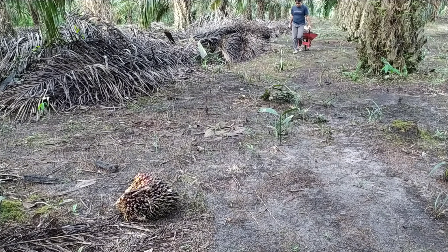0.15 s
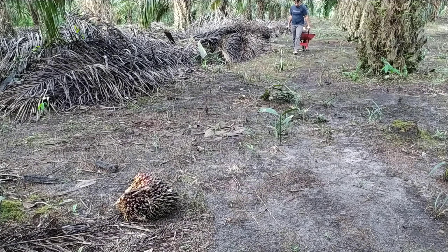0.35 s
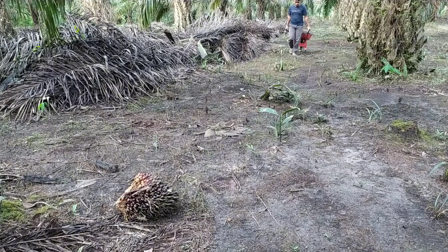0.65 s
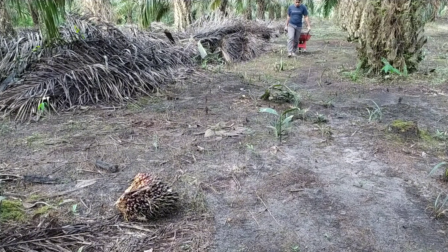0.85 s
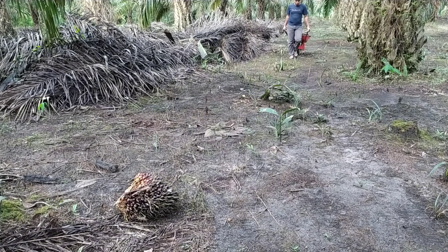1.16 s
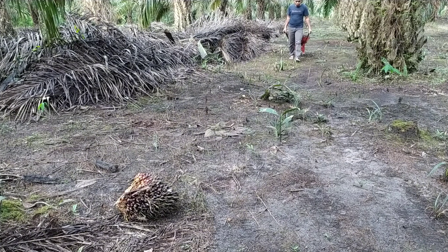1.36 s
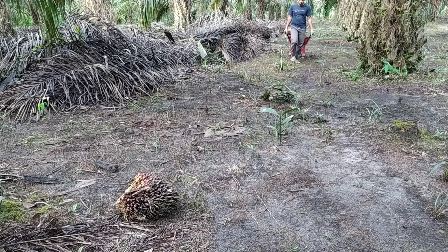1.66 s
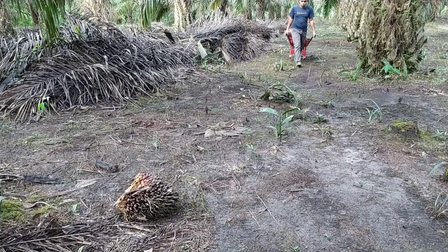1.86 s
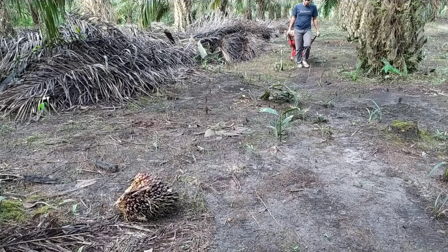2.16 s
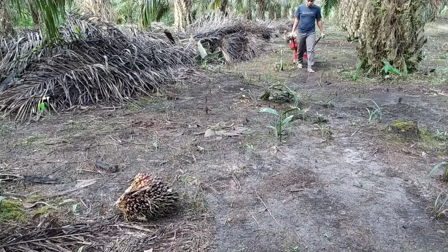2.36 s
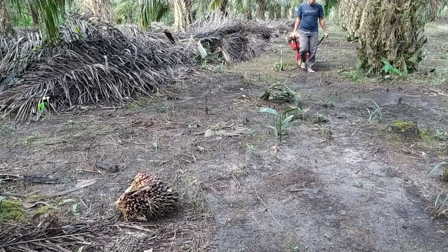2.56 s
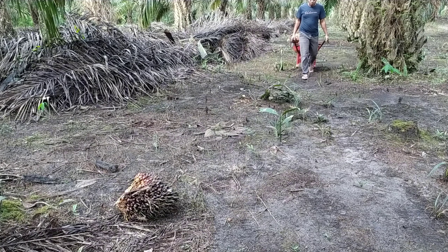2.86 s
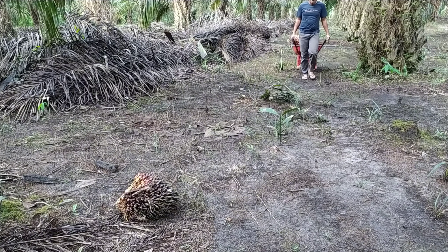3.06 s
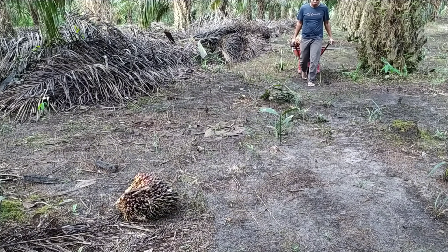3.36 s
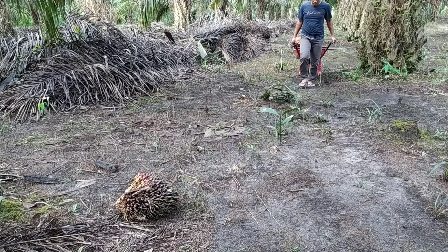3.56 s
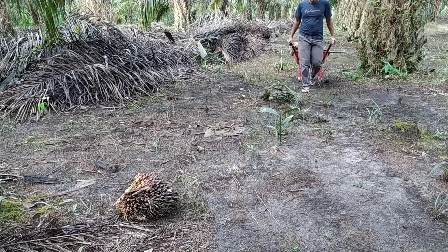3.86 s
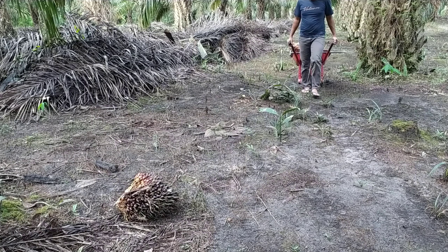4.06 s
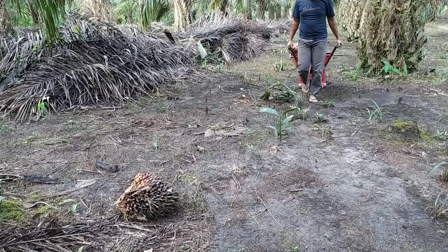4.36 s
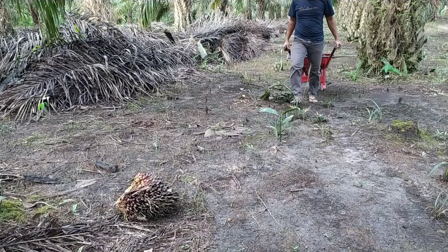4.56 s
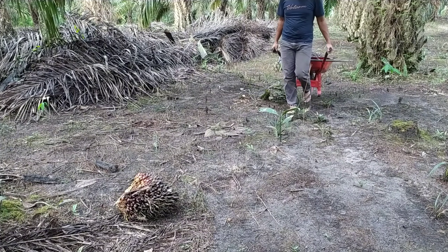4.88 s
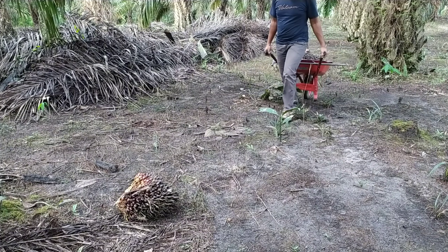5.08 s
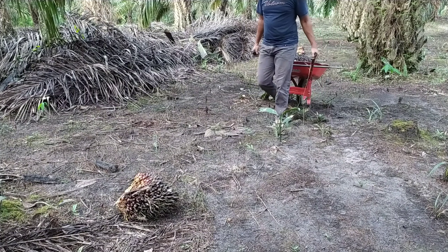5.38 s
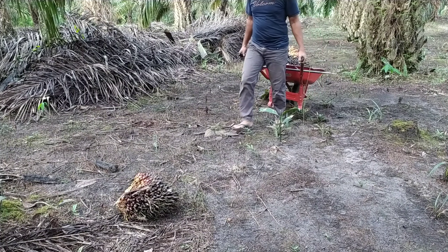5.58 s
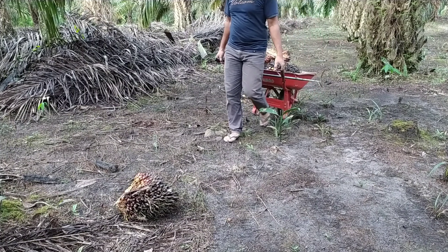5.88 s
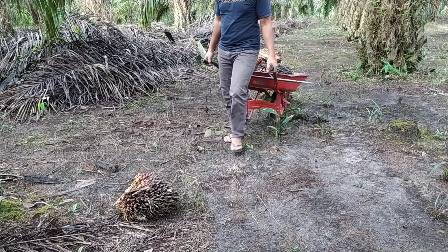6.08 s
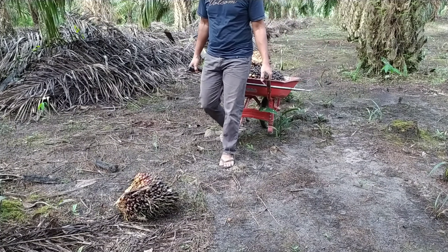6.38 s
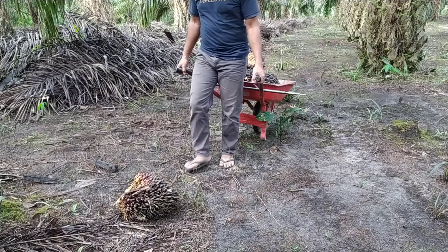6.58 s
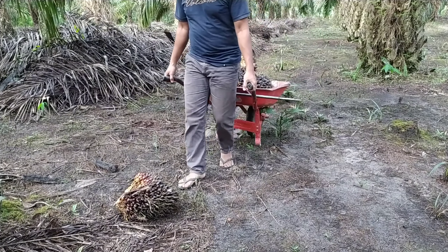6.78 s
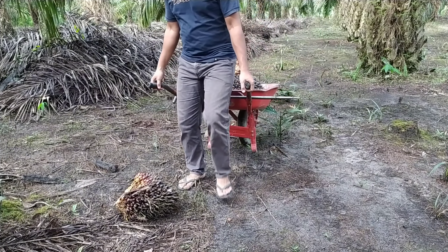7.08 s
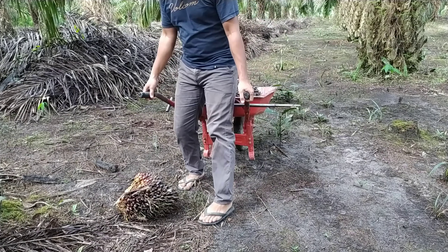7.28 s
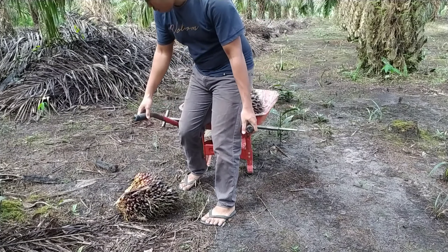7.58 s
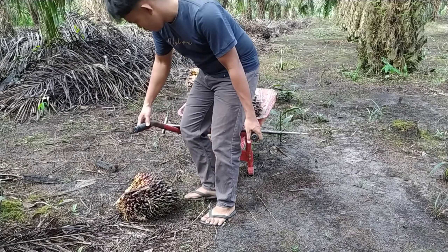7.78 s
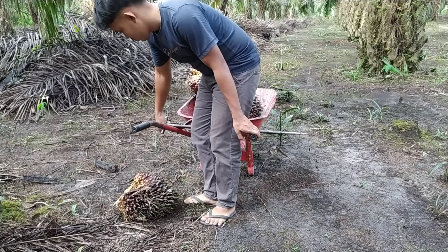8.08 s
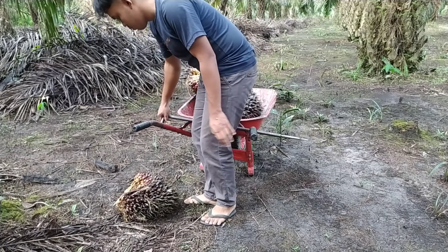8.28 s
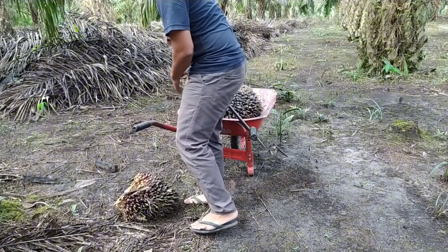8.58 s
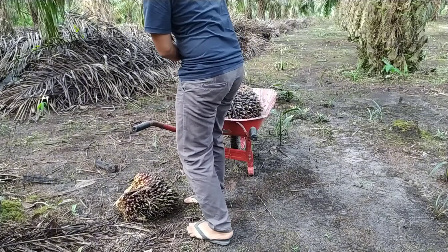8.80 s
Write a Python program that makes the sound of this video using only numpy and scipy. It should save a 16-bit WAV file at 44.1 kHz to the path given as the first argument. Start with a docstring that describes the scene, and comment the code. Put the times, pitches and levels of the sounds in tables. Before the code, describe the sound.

Insects drone steadily as a loaded wheelbarrow rolls closer over crunchy ground, is set down with a rattling knock, and metal clanks.

```python
"""Wheelbarrow in a palm grove

Stereo microphone among the palms: cicadas click their tymbals into a drone, two crickets chirp with
their wings, an engine idles far off. A loaded wheelbarrow comes from 18 m to about 4 m, its tyre
grinding grit, the load bumping, the frame ticking, sandals crunching on dry litter. It is set down
with a rattling knock, then a steel spike lying across it clanks on the tray."""
import sys
import numpy as np
from scipy import signal
from scipy.fft import rfft, irfft, next_fast_len
from scipy.io import wavfile
from scipy.ndimage import uniform_filter1d

SR = 44100
rng = np.random.default_rng(int(sys.argv[2]) if len(sys.argv) > 2 else 0)


def generate_wav(sig):
    """Save sig (samples, or channels by samples) to the path in sys.argv[1] as 16-bit PCM at SR."""
    pcm = np.round(np.clip(np.atleast_2d(sig).T, -1, 1) * 32767).astype(np.int16)
    wavfile.write(sys.argv[1], SR, pcm)


N = 394254

TIME = np.arange(N) / SR
FAR_M, NEAR_M = 18, 4.2  # barrow to microphone, at the start and at the stop
STOP_S, SLOWING_S = 7.2, .2

# likeness of the two channels, high in the bass: f/Hz, correlation
COHERENCE = [(25, .8), (60, .85), (150, .95), (600, .95), (1400, .72), (3000, .35), (6000, 0), (16000, 0)]
# the barrow in the stereo image: f/Hz, left minus right/dB
BARROW_BALANCE = [(200, 1), (1300, 0), (4400, 2.5), (9000, 0), (15000, 19)]
# spectrum of grit under wheel and feet: f/Hz, level/dB
GRIT_SPECTRUM = [(250, -9), (450, -4), (900, -2), (1800, -5), (2700, 0), (3400, -6), (4200, -6), (9000, -5),
                 (15000, -23)]
# spectrum of dry leaves and twigs breaking: f/Hz, level/dB
CRISP_SPECTRUM = [(2000, -44), (4500, -23), (7500, 5), (10500, 8.5), (12500, -2.5), (15500, -9)]


def gain_of(db):
    """Decibels to amplitude."""
    return 10 ** (np.asarray(db) / 20)


def evened(x):
    """Scales to an rms of one."""
    return x / np.sqrt(np.mean(x ** 2) + 1e-20)


def read(points, hz):
    """Reads a table on a logarithmic frequency axis."""
    f, value = np.transpose(points)
    return np.interp(np.log(hz + 1), np.log(f + 1), value)


def level(rows, axis=1):
    """One dB column of a curve as a gain for every sample."""
    rows = np.asarray(rows)
    return gain_of(np.interp(TIME, rows[:, 0], rows[:, axis]))


def add(mix, s, sound):
    """Mixes a sound in at time s."""
    part = mix[:, max(round(s * SR), 0):][:, :sound.shape[-1]]
    part += sound[..., :part.shape[1]]


def noise(spectrum, size=N, grain_db=0, side=None):
    """Stereo noise of a given colour, alike in the bass; grain_db breaks it into separate grains."""
    hz = np.fft.rfftfreq(size, 1 / SR)
    grains = gain_of(grain_db * np.minimum(rng.exponential(1, size), 7))
    mid, wide = rfft(rng.standard_normal((2, size)) * grains)
    same = np.clip(read(COHERENCE, hz), -1, 1)
    z = mid * np.sqrt(1 + same) + np.outer([1, -1], wide * np.sqrt(1 - same))
    if side is not None:
        z = z * gain_of(np.outer([.5, -.5], read(side, hz)))
    return evened(irfft(z * gain_of(read(spectrum, hz)), size))


def wander(rate_hz, size=N):
    """Smooth random drift of rms one, rolled off above the rate."""
    hz = np.fft.rfftfreq(size, 1 / SR)
    return evened(irfft(rfft(rng.standard_normal(size)) * np.exp(-(hz / rate_hz) ** 2), size))


def dying(t, t60):
    """Falls by 60 dB in t60."""
    return np.exp(-np.log(1000) * t / np.maximum(t60, 1e-3))


def burst(spectrum, t60, rise, grain_db=0, side=None):
    """A quick swell of noise that dies away; t60 and rise are in seconds."""
    t = np.arange(SR // 2) / SR
    return noise(spectrum, len(t), grain_db, side) * dying(t, t60) * (1 - np.exp(-t / max(rise, 1e-5)))


def ring(modes, t, split=.0043, uneven_db=2):
    """Struck modes, each a close pair that beats; every blow weights them anew."""
    hz, db, t60 = np.transpose(modes * 2)[:, :, None]
    below_above = np.repeat([-1, 1], len(modes))[:, None]
    hz = hz * (1 + split * below_above * rng.uniform(.52, 1, hz.shape))
    force = gain_of(db + uneven_db * rng.standard_normal(hz.shape))
    # high modes reach the two channels out of step
    skew = np.arccos(read(COHERENCE, hz)) * rng.choice([-.5, .5], hz.shape)
    phase = 2 * np.pi * (hz * t + rng.random(hz.shape))
    envelopes = force / np.linalg.norm(force) * np.sqrt(2) * dying(t, t60)
    return np.array([(envelopes * np.sin(phase + sign * skew)).sum(0) for sign in (1, -1)])


def grove(x, wet_db, t60, pan_db=0):
    """A distant caller at the microphone: direct sound plus scatter from trunks and fronds."""
    t = np.arange(SR // 2) / SR
    taps = rng.standard_normal((2, len(t))) * dying(t, t60)
    taps *= gain_of(wet_db) / np.linalg.norm(taps[0])
    taps[:, 0] += 1
    balance = gain_of([[pan_db / 2], [-pan_db / 2]])
    return balance * signal.fftconvolve(x, taps / np.linalg.norm(taps[0]), axes=1)[:, :N]


def hum(hz, db):
    """One low tone that wavers a little in level."""
    amplitude = np.sqrt(2) * gain_of(db + 1.3 * wander(3))
    return amplitude * np.sin(2 * np.pi * (np.cumsum(hz * np.ones(N)) / SR + rng.random()))


def far_engine():
    """An idling engine so far off that only low orders of its firing rate carry."""
    # the idle: t/s, firing rate/Hz, level of the third order/dB
    idle_course = [(0, 17.25, -61.5), (3.2, 17.3, -58), (3.5, 17.7, -57.5), (8.35, 17.7, -62),
                   (8.52, 17.7, -53), (8.94, 17.7, -53)]
    # weaker orders: multiple of the firing rate, level/dB
    weak_orders = [(2, -68.5), (4, -67)]
    s, firing_hz, main_db = np.transpose(idle_course)
    rate_hz = np.interp(TIME, s, firing_hz) * (1 + .0035 * wander(2.84))
    main = hum(3 * rate_hz, np.interp(TIME, s, main_db))
    return main + sum(hum(k * rate_hz, db) for k, db in weak_orders)


def grove_air():
    """The bed of the grove: still air, a far hum, rumble and a hollow rush that swells and sinks."""
    # spectra of the air, the rumble and the rush: f/Hz, level/dB
    air_spectrum = [(20, 17), (100, 5), (300, 0.5), (600, -8.5), (1200, -11.5), (2200, -9.5), (2550, -15),
                    (3050, -1.5), (3300, -22), (3900, -27), (8000, 0.5), (11800, -23.5), (12750, -2),
                    (13200, 0), (14200, -5.5), (15400, -14), (16200, -35)]
    rumble_spectrum = [(15, -21), (35, -2), (65, 6.5), (85, -2), (130, -23), (300, -54)]
    rush_spectrum = [(80, -23), (130, -6.5), (175, 2), (250, -1), (340, -11), (600, -18), (1200, -40)]
    # swells of the rush: t/s, level/dB
    rush_swells = [(0.1, -70), (0.24, -60), (0.82, -69), (1.0, -57.5), (1.36, -64), (1.78, -57),
                   (1.96, -61), (2.61, -58), (3.97, -66), (4.31, -53.5), (4.41, -60), (5.19, -62.5),
                   (5.35, -55), (6.08, -66.5), (7.16, -55), (7.3, -62.5), (8.2, -67), (8.672, -54.5),
                   (8.94, -60)]
    rumble = hum(hz=67.8, db=-67) + gain_of(-64.5) * noise(rumble_spectrum)
    rush = level(rush_swells) * noise(rush_spectrum) * gain_of(1.46 * wander(13))
    return gain_of(-58.5) * noise(air_spectrum) + rumble + rush


def whines():
    """Faint, very high insect tones out in the grove, most gliding slowly in pitch."""
    # whines: start t/s, length/s, first f/Hz, last f/Hz, level/dB
    whine_glides = [(0, .9, 12150, 12300, -72), (0, .9, 11700, 11790, -75), (3, 2.3, 12360, 12110, -72),
                    (3.1, 1.1, 11590, 11890, -73), (4.2, 1.2, 12030, 12330, -73),
                    (5.1, 1.8, 12120, 11990, -70.5), (6.9, 1.5, 11980, 11890, -72),
                    (8.35, .59, 11560, 11700, -71), (0, 8.94, 7576, 7576, -66)]
    out = np.zeros((1, N))
    for s, length, from_hz, to_hz, db in whine_glides:
        size = int(length * SR)
        jitter = 1 + .003 * wander(200, next_fast_len(size))[:size]
        hz = np.linspace(from_hz, to_hz, size) * jitter
        tone = np.sin(2 * np.pi * np.cumsum(hz) / SR) * signal.windows.tukey(size, .2)
        add(out, s, gain_of(db) * evened(tone))
    return grove(out, wet_db=0, t60=.3)


def far_trill(pitch_hz=6110, pulse_hz=32.4):
    """A thin, distant insect trill: one tone, quickly pulsed."""
    # its comings and goings: t/s, relative level/dB
    trill_swells = [(0, -77), (1, -58), (1.3, -51), (3.1, -53), (3.4, -78), (3.8, -49.5), (5.8, -49),
                    (6.2, -56), (8.94, -60)]
    hz = pitch_hz * (1 + .002 * wander(.6) + .01 * wander(260))
    pulsing = 1 + .5 * np.sin(2 * np.pi * pulse_hz * TIME)
    trill = evened(np.sin(2 * np.pi * np.cumsum(hz) / SR) * pulsing)
    return gain_of(-6.5) * level(trill_swells) * grove(trill[None], wet_db=-2, t60=.3)


def shimmer(chorus, depth_db):
    """Single callers drift in and out of a chorus, each a narrow band of its own."""
    bands = signal.stft(chorus, SR, nperseg=1024)[2]
    patches = uniform_filter1d(rng.standard_normal(bands.shape[1:]), size=2, axis=0)
    patches = evened(uniform_filter1d(patches, size=50, axis=1))
    return evened(signal.istft(bands * gain_of(depth_db * patches), SR, nperseg=1024)[1][:, :N])


def cicadas(heave_period_s=.81, crest_s=.07):
    """Countless tymbal clicks all round merge into two shimmering bands; the upper one heaves slowly."""
    # spectra of the two choruses: f/Hz, level/dB
    low_spectrum = [(3700, -26.5), (4250, -24), (4550, -4.5), (4800, -9.5), (5400, 0), (5900, -8.5),
                    (6400, -1), (7150, 3.5), (7600, -1.5), (8050, -6.5), (8350, 1), (8650, -23),
                    (9500, -53)]
    high_spectrum = [(8200, -65), (8650, -18), (9000, -4.5), (9300, -4.5), (9700, 1.5), (10400, 0.5),
                     (10900, -5), (11200, -12.5), (11500, -49), (12500, -50)]
    # their spread in the stereo image: f/Hz, left minus right/dB
    chorus_balance = [(4500, 5), (7000, -3.5), (8300, 0.5), (9000, -7), (9700, -2), (10400, 11.5),
                      (11100, 11.5), (12000, -3)]
    # course of the drone: t/s, relative level of the low chorus/dB, of the high chorus/dB
    drone_course = [(0, -49, -52), (1, -50, -51), (1.7, -48.5, -52), (4.3, -49, -50), (6.9, -48.5, -51.5),
                    (7.3, -48.5, -53), (8.94, -50, -52)]
    low = shimmer(noise(low_spectrum, grain_db=1.8, side=chorus_balance), depth_db=3.3)
    high = shimmer(noise(high_spectrum, grain_db=1.1, side=chorus_balance), depth_db=2)
    heave_db = .8 * np.cos(2 * np.pi * (TIME - crest_s) / heave_period_s)
    low *= level(drone_course, axis=1) * gain_of(1 + .5 * wander(27))
    high *= level(drone_course, axis=2) * gain_of(3.5 + heave_db + .4 * wander(44))
    return low + high


def chirp(length_s, hz, strokes_hz, sag, rough, sharp):
    """Each wing stroke sounds one short pulse whose pitch sags as the wing slows."""
    t = np.arange(int(length_s * SR)) / SR
    strokes = t * strokes_hz
    progress = strokes % 1
    force = gain_of(.16 * rng.standard_normal(32))[strokes.astype(int)]
    pitch_hz = hz * (1 - sag * (progress - .5) + rough * wander(490, size=16384)[:len(t)])
    pulses = force * np.abs(np.sin(np.pi * progress)) ** sharp
    tone = np.sin(2 * np.pi * np.cumsum(pitch_hz) / SR)
    return evened(pulses * tone * signal.windows.tukey(len(t), .1))


def crickets(beat_s=.17675, syllable_s=.0341, spacing_s=.0435, grow_db=2.2):
    """Two crickets a little to the right: one keeps a beat, a lower one answers in two bouts."""
    # answering calls: middle of the last syllable t/s, syllables, level of the last/dB
    answer_calls = [(2.083, 3, -55), (2.258, 2, -50), (2.55, 3, -45.5), (2.75, 2, -47), (5.0, 2, -52),
                    (5.26, 3, -44.5), (5.5, 3, -44.5), (5.71, 3, -44.5), (5.95, 3, -44.5),
                    (6.157, 2, -45.5), (6.4, 3, -44.5), (6.6, 2, -46.5), (6.803, 2, -47)]
    regular, answering = np.zeros((2, 1, N))
    for k in range(38):
        lag_s = .043 * (1 - np.exp(-k / 4))  # starts a little slowly, then settles
        pulses = chirp(.075, hz=5360, strokes_hz=80, sag=.25, rough=.02, sharp=5.5)
        add(regular, .0285 + k * beat_s + lag_s, gain_of(-51.2 + .5 * rng.standard_normal()) * pulses)
    for last_s, count, db in answer_calls:
        for k in range(count):  # counted back from the last, loudest syllable
            pulses = chirp(syllable_s, hz=4900, strokes_hz=88, sag=.19, rough=.025, sharp=2.5)
            pulses *= signal.windows.tukey(len(pulses), .6)
            add(answering, last_s - k * spacing_s - syllable_s / 2, gain_of(db - k * grow_db) * pulses)
    regular = grove(regular, wet_db=-4, t60=.24, pan_db=-2.5)
    return regular + grove(answering, wet_db=1, t60=.36, pan_db=-1)


def nearness(s):
    """Inverse-distance gain of the barrow, closing at a steady pace: one where it stops."""
    return NEAR_M / np.interp(s, [0, STOP_S], [FAR_M, NEAR_M])


def crunch(length_s, body_db, crisp_db):
    """One press on dry leaves: clumps of dull and crisp grains."""
    size = 16384
    body = gain_of(body_db) * noise(GRIT_SPECTRUM, size, grain_db=3)
    crisp = gain_of(crisp_db) * noise(CRISP_SPECTRUM, size, grain_db=2)
    clumps = (body + crisp) * gain_of(2.2 * wander(110, size) - 1)
    press = signal.windows.tukey(int(length_s * SR), .6)
    return clumps[:, :len(press)] * press


def litter(first_step_s=.85, step_s=.409):
    """Dry leaves crunch under feet and wheel, twigs snap, and sandals scuff nearer at an even pace."""
    # louder crunches: t/s, length/s, body level/dB, crisp level/dB
    leaf_crunches = [(4.081, 0.18, -63, -45), (4.297, 0.15, -56, -48), (4.753, 0.1, -49.5, -41.5),
                     (4.901, 0.064, -60, -50), (5.117, 0.25, -62, -51.5), (5.743, 0.13, -53, -67),
                     (6.188, 0.11, -75, -52), (6.457, 0.12, -57, -65), (6.91, 0.077, -52.5, -66),
                     (7.122, 0.054, -45, -41), (8.746, 0.2, -55.5, -58)]
    # snapping twigs: t/s, level/dB, t60/s
    twig_snaps = [(1.632, -47, .02), (2.083, -44, .02), (4.1258, -22, .009), (4.767, -43, .03),
                  (4.896, -22.5, .009), (5.54, -47, .025), (7.131, -32.5, .06)]
    out = np.zeros((2, N))
    for s, length_s, body_db, crisp_db in leaf_crunches:
        add(out, s, crunch(length_s, body_db, crisp_db))
    for s, db, t60 in twig_snaps:
        add(out, s, gain_of(db) * burst(CRISP_SPECTRUM, t60, rise=.00015))
    for s in np.arange(first_step_s, STOP_S - SLOWING_S, step_s):
        add(out, s, nearness(s) * crunch(length_s=.072, body_db=-60, crisp_db=-67))
    return out


def tyre_grit(rough_at_s=4.444, rough_width_s=.59):
    """The tyre grinds grit: louder as it nears and over a rough patch, quieter as the wheel slows."""
    rough_db = 11.5 * np.exp(-((TIME - rough_at_s) / rough_width_s) ** 2)
    slowing_db = np.interp(TIME, [STOP_S - SLOWING_S, STOP_S], [0, 5])
    grinding = noise(GRIT_SPECTRUM, grain_db=3) * gain_of(2.4 * wander(22))
    return nearness(TIME) * gain_of(-60.8 + rough_db - slowing_db) * grinding


def load_bumps():
    """The load bumps softly in the tray on the way."""
    # bumps: t/s, relative level/dB
    bump_events = [(.009, -42), (0.496, -51.5), (1.029, -51), (1.77, -40), (1.789, -42), (2.19, -44),
                   (2.262, -38.5), (2.305, -51), (3.719, -46.5), (4.314, -53), (4.838, -47), (6.551, -47),
                   (6.931, -45), (7.032, -42), (7.118, -39.5)]
    # spectrum of a bump: f/Hz, level/dB
    bump_spectrum = [(100, -33), (200, 0), (310, 8), (375, 5), (450, 10), (520, 5), (600, 4), (740, -7.5),
                     (1800, -15), (4000, -16), (9000, -36), (15000, -50)]
    out = np.zeros((2, N))
    for s, db in bump_events:
        add(out, s, gain_of(db - 8.5) * burst(bump_spectrum, t60=.24, rise=.00055))
    return out


def frame_ticks():
    """The frame ticks as the barrow rolls: each a dry click followed by a weaker ring."""
    # ticks: t/s, relative level/dB, centre f/Hz, t60 of the ring/s
    tick_events = [(.237, -50.5, 640, 0.079), (.692, -50, 1300, 0.076), (1.02, -50.5, 1500, .16),
                   (1.179, -44, 1000, 0.046), (1.49, -51.5, 2020, 0.23), (1.632, -43.5, 930, 0.074),
                   (1.748, -49, 1330, 0.29), (1.9, -49.5, 950, 0.12), (2.083, -42.5, 950, 0.039),
                   (2.085, -46, 2400, .03), (2.991, -43, 940, 0.1), (3.476, -42, 705, 0.11),
                   (3.483, -46.5, 780, .06), (3.62, -48, 1720, 0.039), (3.905, -47.5, 2190, .06),
                   (3.997, -48.5, 1040, 0.054), (4.313, -40, 700, 0.14), (4.33, -39.5, 1500, .09),
                   (4.368, -39.5, 1910, 0.13), (4.387, -42, 800, 0.23), (4.476, -47, 900, .09),
                   (4.502, -45, 1600, 0.088), (4.595, -48, 1370, .09), (4.768, -40.5, 1300, 0.13),
                   (4.78, -41.5, 1730, 0.22), (4.797, -43, 1500, 0.23), (4.84, -43, 900, 0.067),
                   (5.009, -47, 850, 0.067), (5.541, -37.5, 900, 0.082), (5.844, -34, 2070, 0.074),
                   (5.861, -42, 2020, 0.14), (5.957, -40.5, 1710, 0.16), (6.174, -50.5, 820, 0.072),
                   (6.933, -46, 750, 0.25), (7.03, -43, 735, 0.18)]
    out = np.zeros((2, N))
    for s, db, hz, t60 in tick_events:
        colour = [(hz / 6, -14), (hz / 1.37, -1), (hz * 1.04, 0), (hz * 1.24, -3),
                  (3000, -15), (4200, -25), (12000, -44)]
        click = gain_of(-2.5) * burst(colour, t60=.022, rise=.00051)
        tail = gain_of(-9.5) * burst(colour, t60, rise=.002)
        add(out, s, gain_of(db) * (click + tail))
    return out


def squeak():
    """Steel rubs on steel as the frame takes the weight: a short, very high squeak."""
    # course of the squeak: t/s, level/dB
    squeak_course = [(7.5, -100), (7.55, -64), (7.592, -53), (7.615, -58), (7.65, -54), (7.72, -56),
                     (7.755, -62), (7.8, -100)]
    # its spectrum: f/Hz, level/dB
    squeak_spectrum = [(12000, -45), (12950, -18), (13230, 0), (13600, -12), (14000, -4), (14350, -9),
                       (14700, -40)]
    return level(squeak_course) * noise(squeak_spectrum, side=BARROW_BALANCE) * gain_of(2 * wander(90))


def load_rattle(tray_modes, tray_spectrum, jolts_per_s=140):
    """The load shifts as the barrow tips, and its random jolts shake the tray."""
    # course of the shifting: t/s, relative level/dB
    shift_course = [(7.35, -100), (7.43, -58), (7.47, -50.5), (7.525, -48.5), (7.58, -37), (7.66, -43),
                    (7.75, -39), (7.83, -34), (7.875, -41), (8.05, -52), (8.3, -100)]
    t = np.arange(SR // 2) / SR
    jolts = rng.standard_normal(N) * (rng.random(N) < jolts_per_s / SR)
    # soft fruit: long contacts, little treble
    jolts = level(shift_course) * evened(uniform_filter1d(jolts, size=12))
    body = ring(tray_modes, t) * dying(t, t60=.21)  # the load damps the tray
    knocks = signal.fftconvolve(jolts[None], body / np.linalg.norm(body[0]), axes=1)[:, :N]
    grains = level(shift_course) * noise(tray_spectrum, grain_db=4.5) * gain_of(2.2 * wander(70))
    return gain_of(-14.5) * knocks + gain_of(-10) * grains


def landing():
    """Set down 4 m off: the legs hit the ground, the tray rings, the load rattles and thumps."""
    # blows: t/s, tray level/dB, clatter level/dB, thump level/dB, low-pass f/Hz, rise/s,
    # resonance of the struck spot f/Hz
    landing_blows = [(7.459, -41, -68, -46, 1700, 0.0074, 346), (7.492, -45, -54, -50, 2200, .004, 890),
                     (7.514, -41.5, -48, -54, 2000, .004, 1700), (7.532, -42, -53, -57, 1500, 0.0046, 580),
                     (7.591, -29.5, -37.5, -42.5, 2880, 0.0013, 2270),
                     (7.604, -37, -43, -50, 2800, .002, 2730), (7.618, -35, -39, -39, 1500, 0.0018, 900),
                     (7.681, -31, -30, -40, 6000, 0.0011, 3030),
                     (7.6875, -23, -20, -34, 9000, 0.00049, 1760), (7.703, -26, -43, -38, 1500, .001, 780),
                     (7.721, -28.5, -32, -34, 1490, .001, 770),
                     (7.765, -27.5, -37.5, -38, 900, 0.0012, 540),
                     (7.772, -36, -50, -45, 1500, .0014, 1080), (7.805, -39.5, -47, -52, 1500, .002, 1120),
                     (7.826, -34.5, -42, -50, 2820, .0016, 1120),
                     (7.9025, -29.5, -33, -35.5, 2010, 0.0063, 810)]
    # modes of the tray: f/Hz, level/dB, t60/s
    tray_modes = [(178, -9, 0.66), (230, 0.5, 0.5), (266, -2, 0.75), (345, 4.5, 0.29), (411, -5, 0.43),
                  (470, 1.5, 0.28), (563.4, 1, 0.52), (642, -20, 0.26), (735, 6.5, 0.27), (782, 1, 0.37),
                  (880, -8, 0.69), (995, 10, 0.215), (1047, 3.5, 0.36), (1146, -10, .3), (1232, 3, 0.18),
                  (1270, -4, 0.29), (1394, 3, 0.244), (1517, 1, 0.22), (1750, 8, 0.13), (1826, 7, 0.08),
                  (2210, -3, 0.23), (2328, 14, 0.075), (2500, -9, .18), (2730, 3, 0.3), (3018, 9.5, 0.2),
                  (4680, -3, 0.19)]
    # spectra of the tray's dense ring, the clatter of contact and the load's thump: f/Hz, level/dB
    tray_spectrum = [(70, -42), (130, -2), (200, 2.5), (300, -5), (420, 1), (720, 4), (1250, 7),
                     (1750, -1.5), (2100, -8), (2600, -1), (3400, -16), (5000, -16), (12000, -50)]
    clatter_spectrum = [(600, -27), (1700, 8), (2600, 4), (4000, -1), (5000, 0), (7000, 0.5), (8600, 4),
                        (10500, 5), (11500, -11), (12500, -18), (15500, -24)]
    thump_spectrum = [(70, -25), (130, -10), (175, -2.5), (270, 1.5), (470, 1), (700, -19), (2000, -45)]
    # decay of the dense ring: f/Hz, t60/s
    ring_times = [(150, 0.43), (500, 0.39), (1200, 0.24), (3000, 0.44), (8000, .22), (15000, .18)]
    t = np.arange(SR // 2) / SR
    out = load_rattle(tray_modes, tray_spectrum)
    for s, tray_db, clatter_db, thump_db, dull_hz, rise, spot_hz in landing_blows:
        hz, age, bands = signal.stft(noise(tray_spectrum, len(t), side=BARROW_BALANCE), SR, nperseg=256)
        bands *= dying(age, read(ring_times, hz)[:, None])
        dense = signal.istft(bands, SR, nperseg=256)[1][:, :len(t)]
        tray = gain_of(-9) * dense + gain_of(-6) * ring(tray_modes, t, uneven_db=3)
        tray += 2.2 * signal.lfilter(*signal.iirpeak(spot_hz, Q=5, fs=SR), tray)
        tray = signal.lfilter(*signal.butter(2, dull_hz, fs=SR), tray)  # a softer blow is duller
        swell = 1 - np.exp(-t / rise)
        contact = gain_of(-2) * dying(t, t60=.05)  # the contact itself is brief and hard
        add(out, s, gain_of(tray_db) * (swell + contact) * tray)
        add(out, s, gain_of(thump_db) * burst(thump_spectrum, t60=.3, rise=.0046))
        clatter = burst(clatter_spectrum, t60=.18, rise=rise / 2, grain_db=3, side=BARROW_BALANCE)
        add(out, s, gain_of(clatter_db) * clatter)
    return out


def spike(drop_s=7.9021, rebound_s=.0025, rebound_loss_db=3, cluster_width_hz=140):
    """The steel spike slaps the tray's rim, rings, and chatters in ever smaller rebounds."""
    # modes of the spike: f/Hz, level/dB, t60/s
    spike_modes = [(444, -6, 0.35), (770, -6, 0.4), (825, -9, .35), (963, 4.5, 0.33), (990, 5, 0.27),
                   (1054, 4.5, 0.22), (1575, -3, 0.25), (1590, -6, 0.22), (1943, -9.5, 0.28),
                   (1980, -12, 0.26), (2215, -2, .22), (2595, -11, 0.13), (2745, -8.5, 0.31),
                   (3270, -6, 0.25), (3570, -12, 0.36), (4188, -6, 0.26), (4737, -11, .14),
                   (5028, -4, 0.26), (5050, -6, .2), (5760, -4, .24), (5800, -1, 0.13), (6590, -5, .17),
                   (7900, 1, .17), (8100, -3, .16), (8900, 0, 0.25), (9700, 2, 0.29), (9920, 6, .16),
                   (10718, -2, .15)]
    # clusters of its crowded upper modes: centre f/Hz, level/dB
    mode_clusters = [(1620, -1), (2050, -4), (2680, 2.5), (3400, -6.5), (4200, -4), (4970, -1), (5750, -4),
                     (6580, -2), (7150, -6), (7900, 2.5), (8500, 2), (9100, 4), (9880, 0), (10700, 2),
                     (11350, -1)]
    # spectrum of the slap on the rim: f/Hz, level/dB
    slap_spectrum = [(300, -16), (1600, 2), (4000, -5), (10000, 4), (12500, -3), (13600, -2), (15500, -8)]
    out = np.zeros((2, N))
    t = np.arange(SR // 2) / SR
    hz = np.arange(0, SR / 2, 20)
    humps = sum(gain_of(db) * np.exp(-.5 * ((hz - centre) / cluster_width_hz) ** 2)
                for centre, db in mode_clusters)
    cluster_spectrum = np.column_stack([hz, 20 * np.log10(humps + 1e-3)])
    sheen = burst(cluster_spectrum, t60=.2, rise=.0003, side=BARROW_BALANCE)
    clank = ring(spike_modes, t, split=.005, uneven_db=1.5) * (1 - np.exp(-t / .0015))
    add(out, drop_s, gain_of(-22.5) * sheen + gain_of(-23) * clank)
    for k in range(3):
        slap = burst(slap_spectrum, t60=.043, rise=.0003, side=BARROW_BALANCE)
        add(out, drop_s + k * rebound_s, gain_of(-28 - k * rebound_loss_db) * slap)
    return out


def scene():
    """Insects all round the microphone, the barrow in front."""
    insects = cicadas() + crickets() + far_trill() + whines()
    background = far_engine() + grove_air()
    approach = tyre_grit() + load_bumps() + frame_ticks() + litter()
    set_down = landing() + spike() + squeak()
    return background + insects + approach + set_down


def record(dry):
    """The recorder's band limit: a steep low-pass."""
    edge_hz = 15900
    taps = signal.firwin(511, edge_hz, window=("kaiser", 9), fs=SR)
    return signal.oaconvolve(dry, taps[None], "same")


dry = scene()
out = record(dry)
generate_wav(out)
```